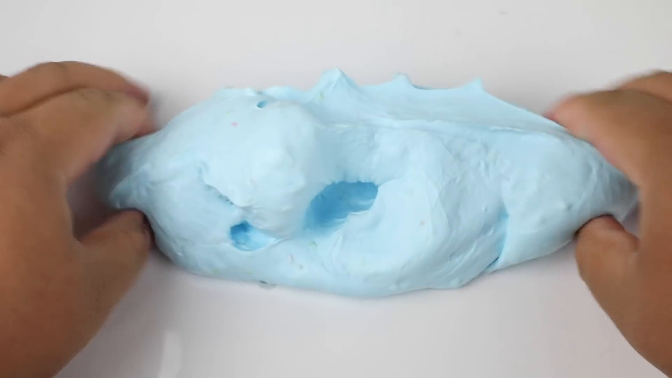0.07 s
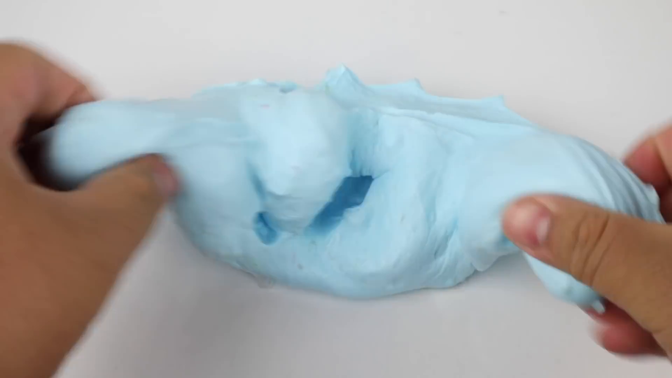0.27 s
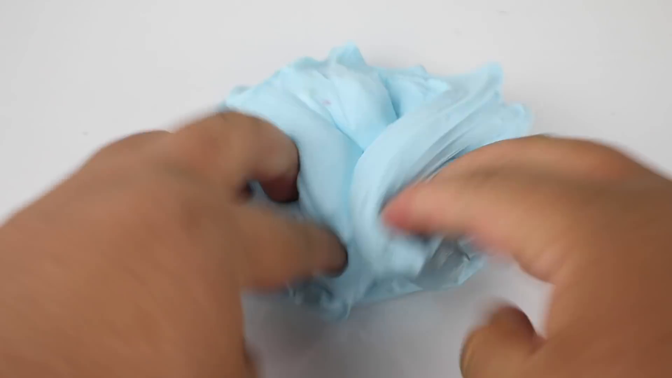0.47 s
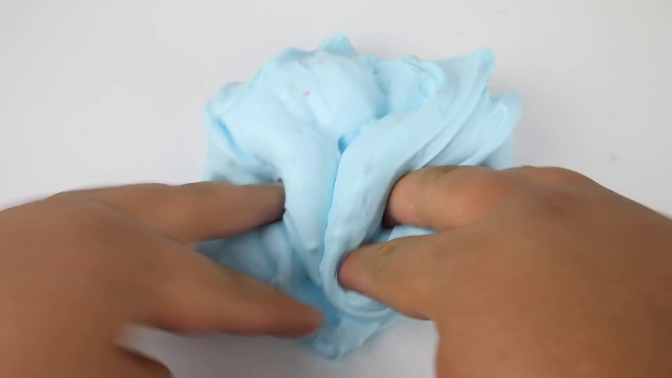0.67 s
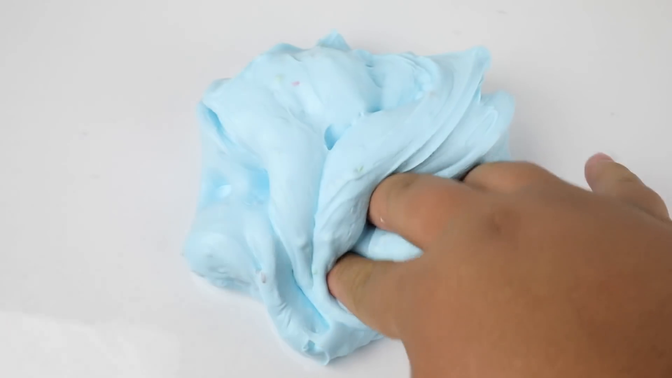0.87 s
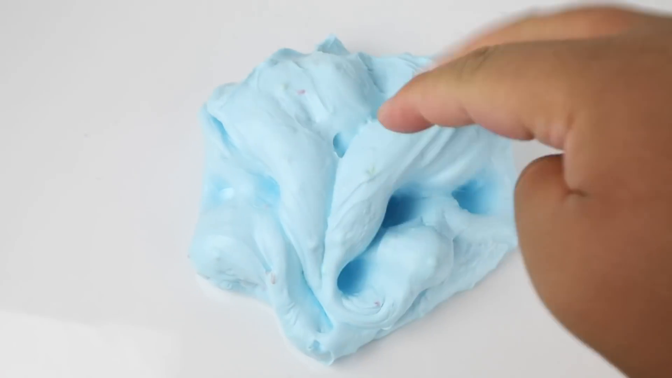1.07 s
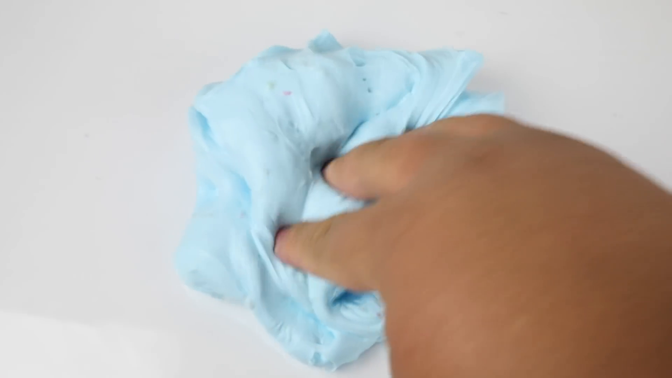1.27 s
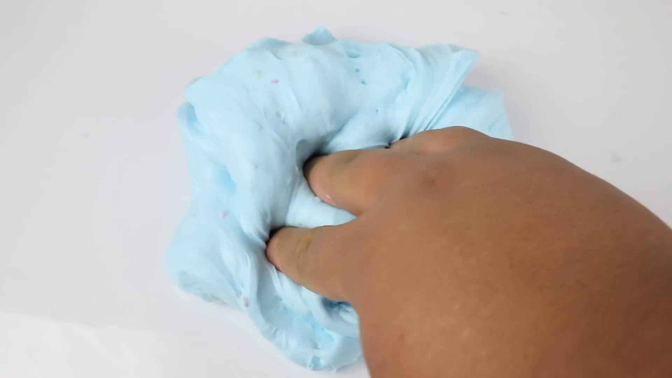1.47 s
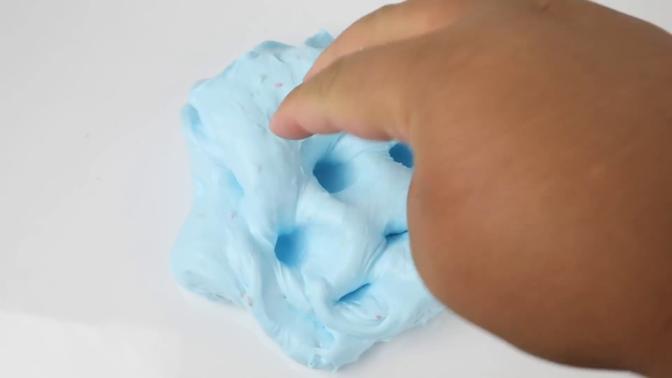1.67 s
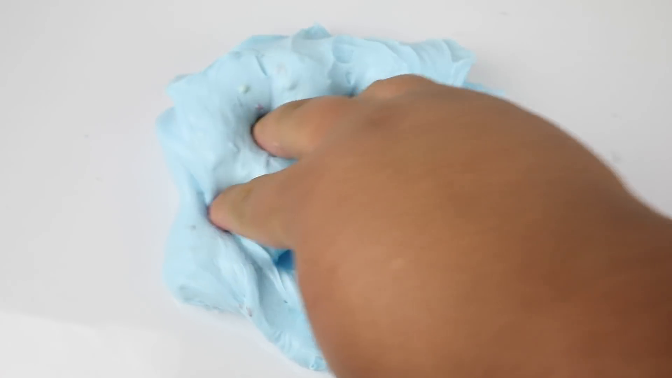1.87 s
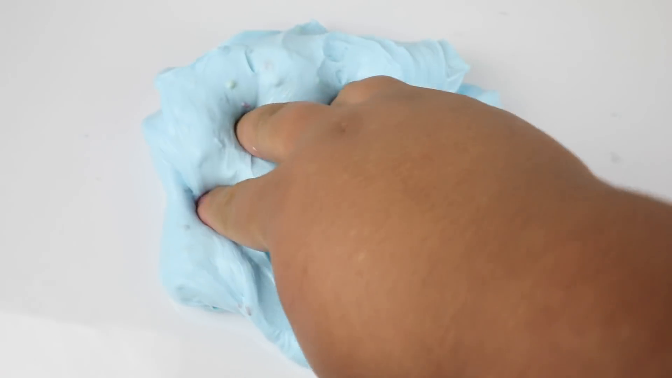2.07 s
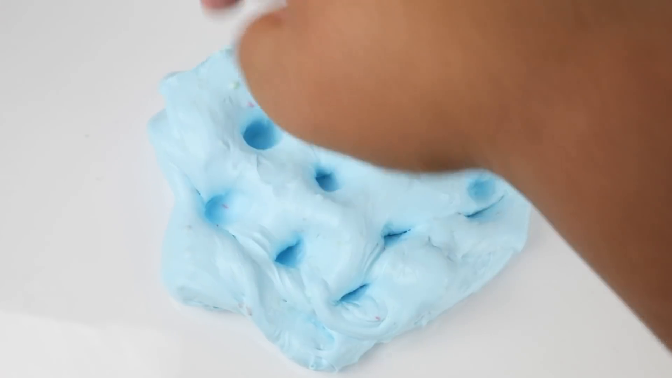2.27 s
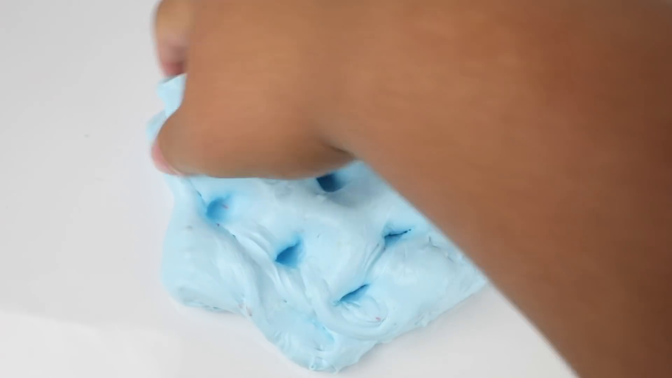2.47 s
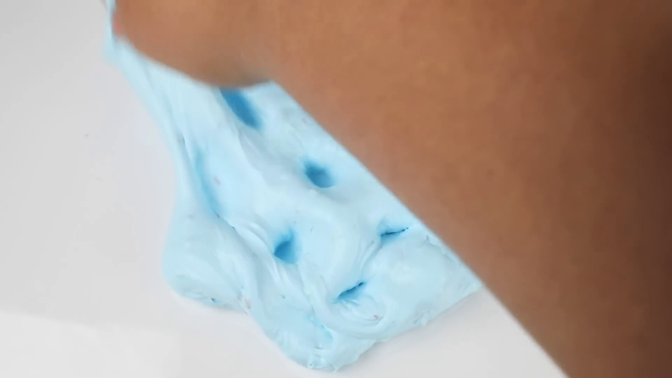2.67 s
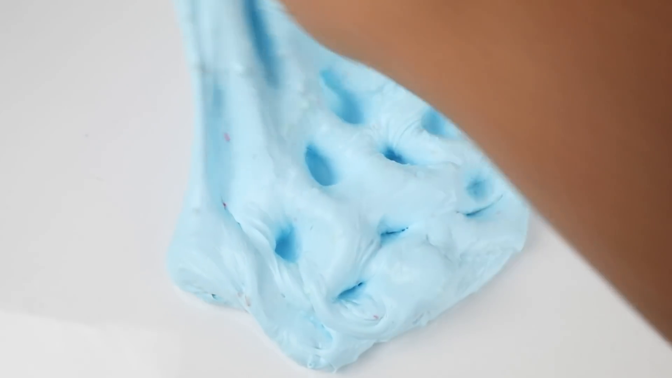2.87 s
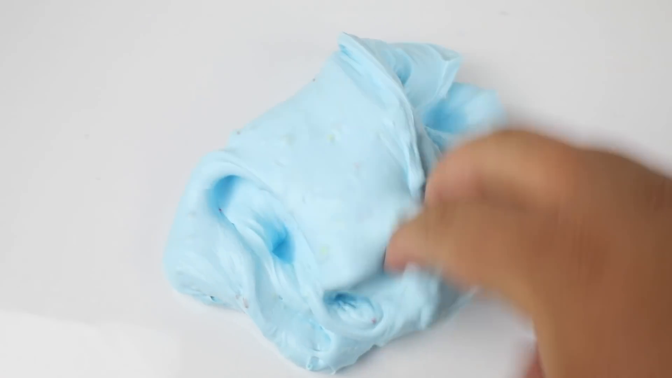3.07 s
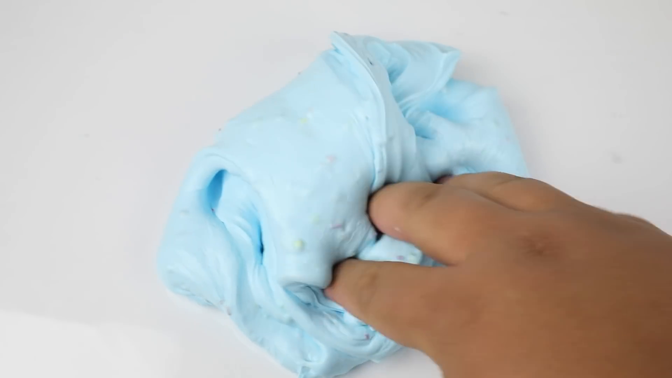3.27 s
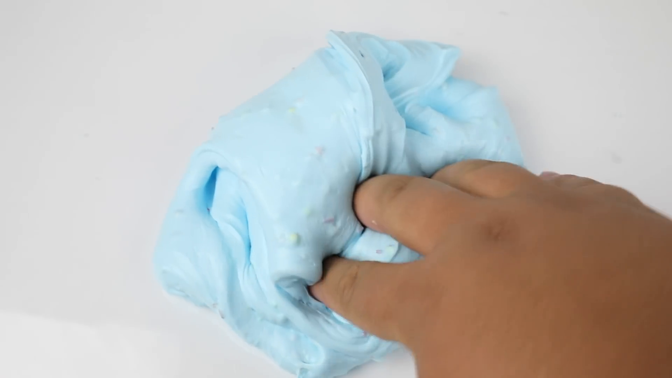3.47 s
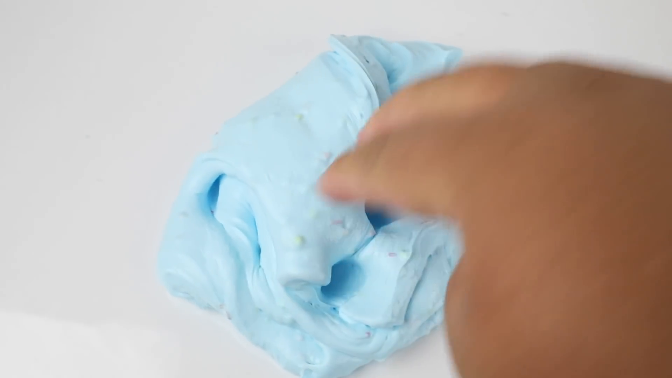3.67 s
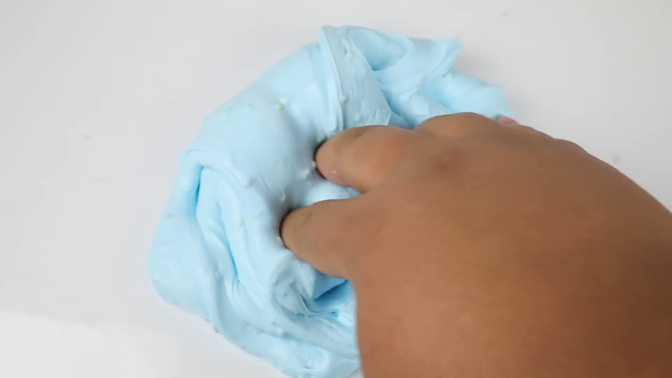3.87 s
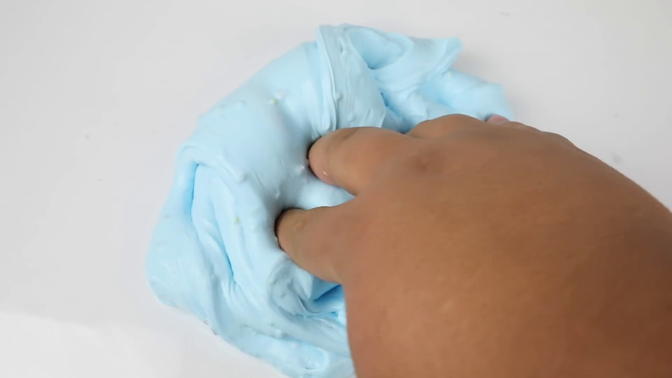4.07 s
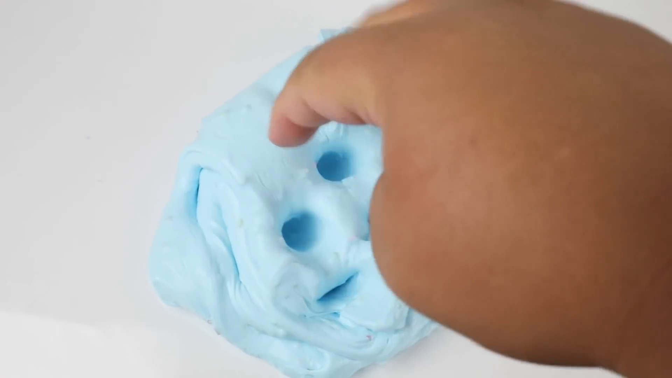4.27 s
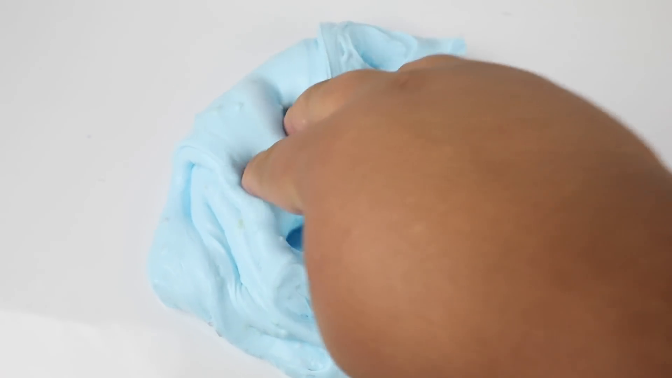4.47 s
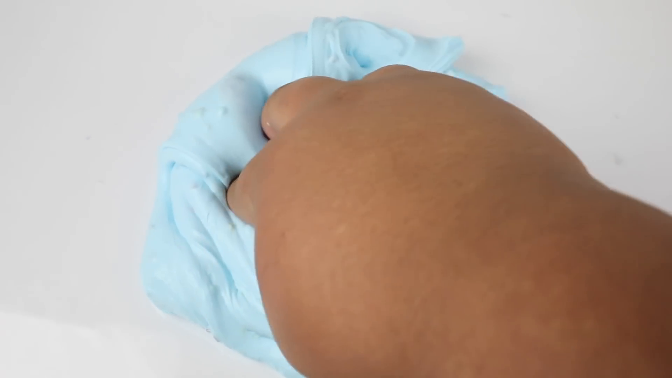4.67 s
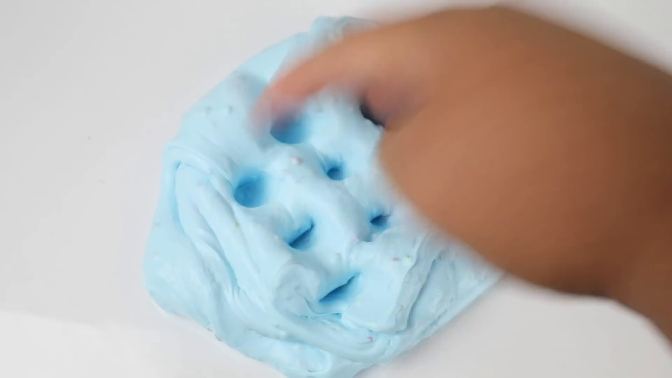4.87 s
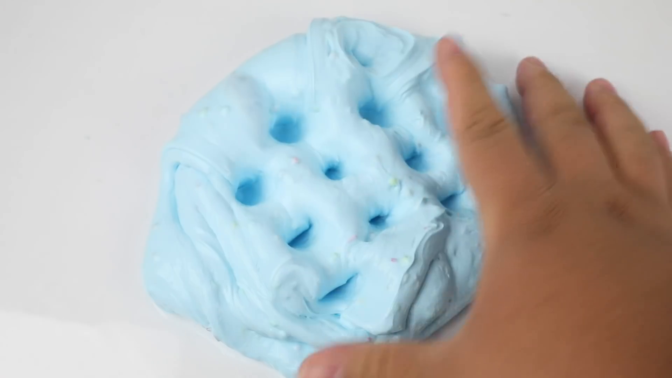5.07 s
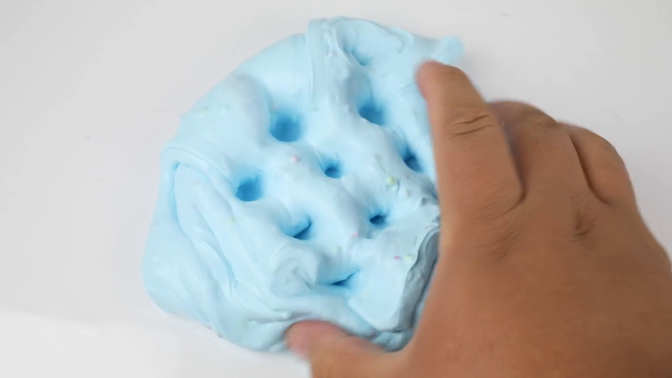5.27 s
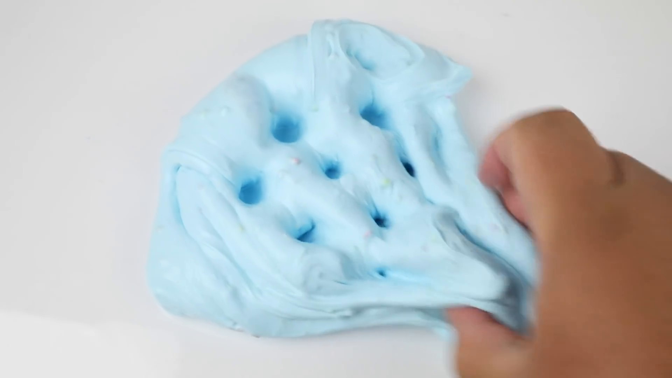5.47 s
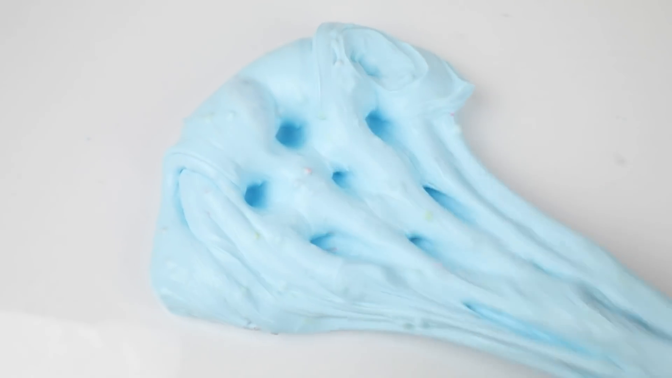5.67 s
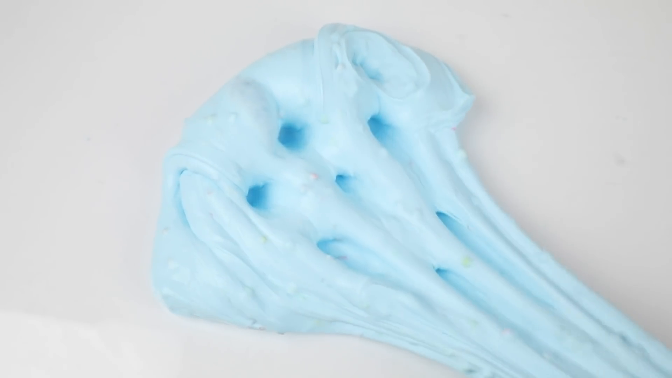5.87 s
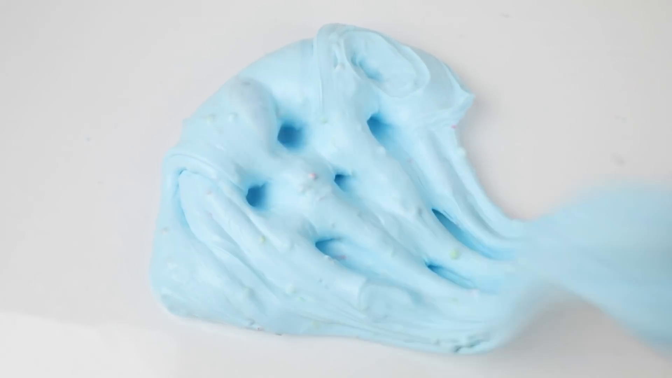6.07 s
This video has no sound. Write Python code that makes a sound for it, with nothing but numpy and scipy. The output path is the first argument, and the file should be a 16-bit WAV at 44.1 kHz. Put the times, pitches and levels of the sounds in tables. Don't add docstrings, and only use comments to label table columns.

```python
import sys
import numpy as np
from scipy import signal
from scipy.io import wavfile
from scipy.ndimage import uniform_filter1d

SR = 44100
rng = np.random.default_rng(int(sys.argv[2]) if len(sys.argv) > 2 else 0)


def elevation(decibels):
    levels = np.asarray(decibels, float)
    return 10 ** (levels / 20)


def store_wav(level_fs):
    pcm = np.round(np.clip(np.atleast_2d(level_fs), -1, 1) * 32767)
    wavfile.write(sys.argv[1], SR, pcm.T.astype(np.int16))


N = 269430


def read(points, hz):
    f, value = np.transpose(points)
    return np.interp(np.log(hz + 1), np.log(f + 1), value)


def evened(x):
    return x / np.sqrt(np.mean(x ** 2) + 1e-20)


def peaked(x):
    return x / np.max(abs(x))


def add(mix, s, sound):
    part = mix[round(s * SR):][:len(sound)]
    part += sound[:len(part)]


def colour(x, points):
    hz = abs(np.fft.fftfreq(4096, 1 / SR))
    log_gain = np.log(elevation(np.maximum(read(points, hz), -80)))
    phase = -signal.hilbert(log_gain).imag
    taps = np.fft.ifft(np.exp(log_gain + 1j * phase)).real[:2048]
    return signal.oaconvolve(x, taps)[:len(x)]


def ring(x, hz, width_hz):
    r = np.exp(-np.pi * width_hz / SR)
    return signal.lfilter([1 - r], [1, -2 * r * np.cos(2 * np.pi * hz / SR), r * r], x)


def band(x, lo_hz, hi_hz):
    return signal.sosfilt(signal.butter(2, [lo_hz, hi_hz], "bandpass", fs=SR, output="sos"), x)


# [f/Hz, level/dB per Hz]
HUSH_SPECTRUM = [(12, -56), (20, -25), (74, 2), (154, -10), (187, -5.5), (270, -11), (310, -7.5),
                 (472, -20.5), (607, -19), (1660, -31), (1960, -31), (3740, -34.5), (16000, -38.5)]
HUSH_DB = -54.5
# [t/s, level/dB]
ARM_SWAY = [(0.0, -36), (0.19, -43.5), (0.51, -47.5), (1.0, -52.5), (1.411, -45.5), (1.581, -54),
            (1.819, -38), (2.21, -59), (2.43, -39), (2.67, -41), (2.8, -68), (3.55, -63), (3.81, -37.5),
            (4.051, -67.5), (4.6, -52.5), (4.8, -39), (5.45, -44), (6.11, -58)]
UPPER_DB, UPPER_FOLLOW = -59, .4


def hush():
    still = elevation(HUSH_DB) * evened(colour(rng.standard_normal(N), HUSH_SPECTRUM))
    sway_db = np.interp(np.arange(N) / SR, *np.transpose(ARM_SWAY))
    a, b = rng.standard_normal((2, N))
    low = elevation(sway_db - 7) * evened(band(band(a, 35, 120), 35, 120))
    upper = elevation(UPPER_DB + UPPER_FOLLOW * (sway_db + 48.5)) * evened(band(b, 120, 420))
    return still + low + upper


# [f/Hz, t60/s]
ROOM_DECAY = [(80, 0.7), (250, 0.51), (600, 0.31), (1500, 0.36), (4000, 0.33), (8000, 0.28), (14000, 0.18)]


def tail():
    taps = np.zeros(SR)
    count = SR // 20 - 1
    spots = np.arange(0, SR - 20, 20) + rng.integers(0, 20, count)
    taps[spots] = rng.choice([-1., 1.], count)
    hz, t, z = signal.stft(taps, SR, nperseg=256)
    decay = elevation(-60 * t / read(ROOM_DECAY, hz)[:, None])
    late = signal.istft(z * decay, SR, nperseg=256)[1]
    late *= 1 - np.exp(-np.arange(len(late)) / SR / 0.008)
    return late / np.linalg.norm(late)


# [t/s, level/dB]
NEAR_ECHOES = [
    (.0011, -32.5),
    (.0037, -26),
]
MOVE_S = .11


def room(x):
    out = np.zeros(N)
    turn = np.pi * np.arange(N) / SR / MOVE_S
    for k in range(3):
        late = band(tail(), 330, 19500)
        t = np.arange(len(late)) / SR
        scatter = rng.standard_normal(len(t)) * elevation(-60 * t / 0.043) * (t > .0008)
        reply = elevation(-15) * late + elevation(-8.0) * scatter / np.linalg.norm(scatter)
        for s, db in NEAR_ECHOES:
            reply[round(s * SR)] += elevation(db)
        window = np.sqrt(2 / 3) * np.cos(turn + k * np.pi / 3)
        out += signal.oaconvolve(x * window, reply)[:N]
    return out


# [f/Hz, level/dB, t60/s]
TABLE_MODES = [(82.3, -7, 0.43), (123, -0.5, 0.18), (188.5, -4.5, .3), (302, -3, 0.31), (388, -14.5, 0.22),
               (440, -15, 0.1)]


def table(pushes, pockets):
    t = np.arange(SR // 2) / SR
    modes = sum(elevation(db - 60 * t / t60) * np.sin(2 * np.pi * hz * t) for hz, db, t60 in TABLE_MODES)
    thump = 1.4 * np.exp(-t / 0.012) * np.sin(2 * np.pi * 140 * t)
    soft = peaked(band(modes + thump, 78, 280))
    pushed = signal.oaconvolve(pushes, soft)[:N]
    shaken = elevation(-43) * signal.oaconvolve(pockets, modes)[:N]
    return pushed + shaken


# [peak t/s, crackle level/dB, rise/s, fall/s, wetness/dB]; rise and fall span 20 dB
FOLDS = [(0.094, -76, 0.021, 0.027, 22), (0.206, -41.5, 0.05, 0.026, 7), (0.23, -43.5, 0.01, 0.028, 2),
         (0.362, -47, .4, 0.018, -0.5), (0.45, -47, 0.097, 0.058, -6), (0.556, -44, 0.0056, 0.028, 0),
         (0.58, -54.5, 0.02, 0.11, -1), (0.76, -39, 0.026, 0.043, 1.5), (0.799, -44, 0.091, 0.013, -8),
         (1.647, -58, 0.012, 0.011, 11.5), (2.237, -57.5, 0.011, .012, 15.5), (2.567, -69, 0.027, .022, 6),
         (2.626, -47, 0.0099, 0.013, 5), (2.71, -47.5, 0.18, .1, 2.5), (3.115, -51, 0.091, 0.0307, -1),
         (3.186, -61, .028, 0.031, 12.5), (3.834, -54.5, 0.11, 0.24, -2), (4.265, -57.5, 0.036, 0.011, 9),
         (5.345, -52, .05, .02, -2), (5.43, -40, 0.06, 0.04, 2.5), (5.483, -42, .005, 0.064, 1),
         (5.535, -61.5, .08, .05, 12), (5.695, -51, .25, 0.036, 0.5), (6.095, -53, 0.042, .2, 2)]
# [f/Hz, level/dB per Hz]
FIZZ_SPECTRUM = [(710, -48.5), (1200, 5.5), (1590, -19.5), (2560, -13), (2830, -10.5), (4360, -4.5),
                 (5710, -7), (15300, -12), (16400, -20.5)]
BUBBLE_NOTES = [1100, 1600, 2300, 3300, 4500, 6500, 9500, 13000]
AIR_DB, AIR_PER_WET = -3.5, -0.8


def folding():
    clumps = elevation(2.8 * evened(uniform_filter1d(rng.standard_normal((2, N)), 300)))
    size = elevation(2.8 * np.minimum(rng.exponential(1, N), 5)) * rng.standard_normal(N)
    grains = size * (rng.random(N) < 16000 / SR)
    dull_kind = len(BUBBLE_NOTES)
    kind = rng.integers(0, dull_kind + 1, N)
    notes = np.zeros(N)
    for k, hz in enumerate(BUBBLE_NOTES):
        notes += band(grains * (kind == k), hz / 1.6, hz * 1.6) * hz ** 0.25
    fizz = colour(notes * clumps[0], FIZZ_SPECTRUM)
    bright = evened(band(fizz, 1300, 6600))
    airy = evened(band(fizz, 5000, 16000))
    dull = evened(band(grains * (kind == dull_kind) * clumps[1], 300, 2100))

    s, db, rise_s, fall_s, wet_db = np.transpose(FOLDS)[:, :, None]
    steps = np.arange(0, N + 32, 32)
    late = steps / SR - s
    swells = elevation(db - 3.5 - 20 * np.maximum(-late / rise_s, late / fall_s))
    out = np.zeros(N)
    for layer, share_db in [(bright, 0 * wet_db), (dull, wet_db), (airy, AIR_DB + AIR_PER_WET * wet_db)]:
        level = (swells * elevation(share_db)).sum(0)
        out += layer * np.interp(np.arange(N), steps, level)
    return out


# [f/Hz, level/dB per Hz]
CRACK_SPECTRUM = [(300, -22), (900, -8.5), (2000, 1.5), (4500, 7), (7000, 3), (11000, -2), (15500, -14)]


def crack(hz, tilt_db, chance, spread_s, width_hz, share):
    t = np.arange(len(chance)) / SR
    spray = chance * np.exp(-t / spread_s) * .17
    spray[0] = -1
    tilted = [(f, db + tilt_db * np.log2(f / 4000)) for f, db in CRACK_SPECTRUM]
    wide = colour(spray, tilted)
    return peaked(evened(wide) + share * evened(ring(wide, hz, width_hz)))


# [t/s, level/dB, f/Hz, dull part level/dB]
TICKS = [(0.0832, -29, 1360, -38), (0.1211, -45, 1250, -41), (0.2297, -45, 1560, -23),
         (0.2857, -36, 1270, -64), (0.4444, -27, 1450, -38.5), (0.5534, -21.5, 2110, -47),
         (0.5621, -25, 9060, -50), (0.5876, -44, 1300, -39), (0.7392, -12.5, 2855, -31),
         (0.7655, -15, 9570, -52), (0.7858, -22.5, 3290, -54.5), (1.435, -28.5, 2340, -36),
         (1.9451, -44.5, 1198, -35), (1.99, -39, 1670, -52), (2.571, -40, 1315, -44),
         (3.1852, -39.5, 1266, -36.5), (3.2814, -23.5, 4777, -46), (3.8292, -24, 2274, -45.5),
         (3.8526, -29.5, 1440, -45.5), (3.9454, -36.5, 2135, -54), (4.6132, -36.5, 1227, -41.5),
         (5.3418, -32, 2210, -63), (5.3755, -36, 3000, -50), (5.4165, -32, 7000, -41),
         (5.4276, -25.5, 1215, -34), (5.4817, -23, 1350, -49), (5.5114, -31, 2020, -63),
         (5.5244, -46.5, 1643, -36), (5.6406, -29, 3960, -41), (5.6526, -47.5, 1260, -35)]
TICK_TILT_DB = 1.8


def ticks():
    out = np.zeros(N)
    t = np.arange(500) / SR
    chance = rng.standard_normal((len(TICKS), 500))
    for (s, db, hz, dull_db), a in zip(TICKS, chance):
        plop = peaked(band(a * np.exp(-t / .0022), 500, 1800))
        add(out, s + .0006, elevation(db - 3) * crack(hz, TICK_TILT_DB, a, .0004, 1400, .5))
        add(out, s, elevation(dull_db + 2.5) * plop)
    return out


def pocket(hz, chance):
    t = np.arange(len(chance)) / SR
    wobble = 1 + .1 * evened(uniform_filter1d(chance, 45))
    slow_drop = hz * (.9 + .25 * np.exp(-t / .004))
    fast_drop = (1900 - hz) * np.exp(-t / .0007)
    turns = np.cumsum((slow_drop + fast_drop) * wobble) / SR
    swell = turns ** 2 * np.exp(-(turns / 2.1) ** 2) + .6 * np.exp(-turns / 1.5)
    slurp = evened(band(chance[::-1], 730, 2800)) * np.exp(-t / 0.0064)
    return peaked(-np.sin(2 * np.pi * turns) * peaked(swell) + 0.3 * slurp)


# [t/s, crack level/dB, crack f/Hz, pocket level/dB, pocket f/Hz]
POPS = [(1.0726, 5.5, 4900, -3.5, 1200), (1.0930, 8, 3340, -0.5, 800), (1.1085, -1, 4470, -6, 767),
        (1.6552, 10, 4800, 0, 589), (1.6811, -1.5, 4000, 3.5, 440), (1.7042, -2.5, 3200, -8.5, 500),
        (2.2435, 3, 4000, -3, 1100), (2.2763, 7, 5716, 1.5, 440), (2.3003, 0.5, 4710, 0.26, 464.4),
        (2.5050, -23, 2505, -18, 1200), (3.6221, 6.5, 4720, -5.5, 1250), (3.6552, 3.5, 4210, 2.5, 402),
        (3.6691, -1.5, 4520, -4, 870), (4.2734, 7.5, 4020, 0, 430), (4.2974, 1.7, 3527, -3, 446),
        (4.3220, 5, 4648, -9.5, 794), (4.9251, 5.5, 5890, -24.5, 751), (4.9437, 4.5, 7405, -25, 896),
        (4.9680, 1, 4760, -18, 1117)]
# [t/s, crack level/dB, pocket level/dB, pocket f/Hz]
TEARS = [(1.0761, -8.5, -4.5, 547), (1.0968, -4, -7.5, 506), (1.1060, -3.5, -7.5, 440),
         (1.6825, 1, -20.5, 910), (1.7060, -4.5, -17, 615), (1.7103, -1.5, -1, 478.8),
         (2.3038, -9, -16.5, 501), (3.6240, -9.5, -12.5, 518), (3.6650, -1, -15, 596),
         (4.2770, -3, -13.5, 352.4), (4.3252, -8.5, -5.5, 471), (4.9236, 1, -25, 781),
         (4.9281, -8.5, -9.5, 563), (4.9455, 2, -5.5, 1500), (4.9712, -7.5, -6.5, 476)]
TEAR_HZ = 4900
# [t/s, boom level/dB, knock level/dB, knock f/Hz]
THUDS = [(0.0835, -23.5, -39, 290), (0.753, -26.5, -33, 302), (0.764, -23, -36.5, 494.5),
         (.785, -20.5, -33, 388), (1.074, -15.5, -16.5, 330), (1.095, -17, -12, 340.6),
         (1.111, -17, -12.5, 300), (1.655, -15.5, -12.5, 337.9), (1.68, -18, -15, 481),
         (1.703, -17.5, -13.5, 420), (2.242, -21, -13.5, 468.3), (2.276, -20, -11, 332.4),
         (2.303, -14.5, -10, 299), (2.505, -18, -17.5, 310), (3.624, -24.5, -10, 413.5),
         (3.656, -18.5, -12, 455.3), (4.275, -15.5, -8, 356.7), (4.297, -14.5, -9.5, 386.4),
         (4.323, -25.5, -8.5, 398), (4.926, -28, -19.5, 390.3), (4.945, -21, -16.5, 374),
         (4.969, -21.5, -17, 394), (5.634, -49, -34.5, 502)]
RIM_HZ, RIM_TILT_DB, RIM_TILT_SLOPE_DB = 4250, 1.54, 6.5


def pops():
    out, pushes, pockets = np.zeros(N), np.zeros(N), np.zeros(N)
    t = np.arange(900) / SR
    holes = POPS + [(s, db, TEAR_HZ, pocket_db, hz) for s, db, pocket_db, hz in TEARS]
    chance = rng.standard_normal((len(holes), 2, 1200))
    for (s, crack_db, crack_hz, pocket_db, pocket_hz), (a, b) in zip(holes, chance):
        tilt_db = RIM_TILT_DB + RIM_TILT_SLOPE_DB * np.log2(crack_hz / RIM_HZ)
        creep = band(b[:900], 900, 6300) * np.exp((t - .02) / .008)
        add(out, s, elevation(crack_db) * crack(crack_hz, tilt_db, a, .0008, 2600, .45))
        add(out, s - .02, elevation(crack_db - 43.5) * creep)
        add(pockets, s, elevation(pocket_db) * pocket(pocket_hz, b))
    for (s, db, knock_db, knock_hz), a in zip(THUDS, rng.standard_normal((len(THUDS), 900))):
        knock = peaked(band(a * np.exp(-t / .004), knock_hz / 1.45, knock_hz * 1.45))
        add(pushes, s, elevation([db]))
        add(out, s, elevation(knock_db) * knock)
    return band(out + pockets, 84, 19000), table(pushes, pockets)


def scene():
    burst, boom = pops()
    slime = burst + ticks() + folding()
    return (slime + room(slime) + boom + hush())[None]


def low_pass(x):
    return signal.sosfilt(signal.butter(12, 16460, fs=SR, output="sos"), x)


def record(dry):
    overloaded = np.clip(dry, -1, 1)
    return low_pass(overloaded)


dry = scene()
out = record(dry)
store_wav(out)
```